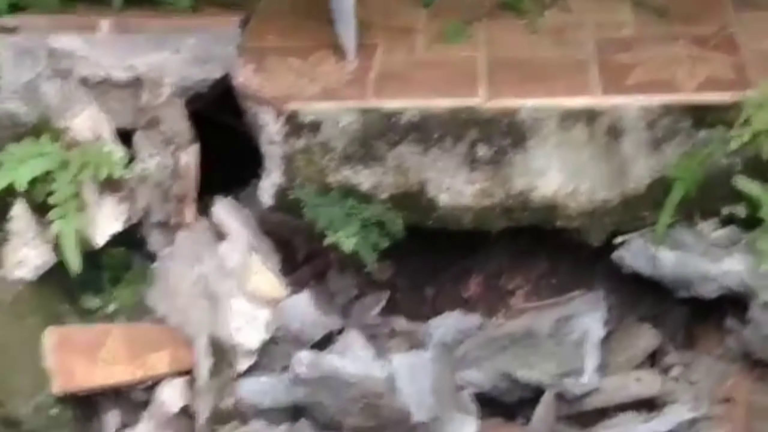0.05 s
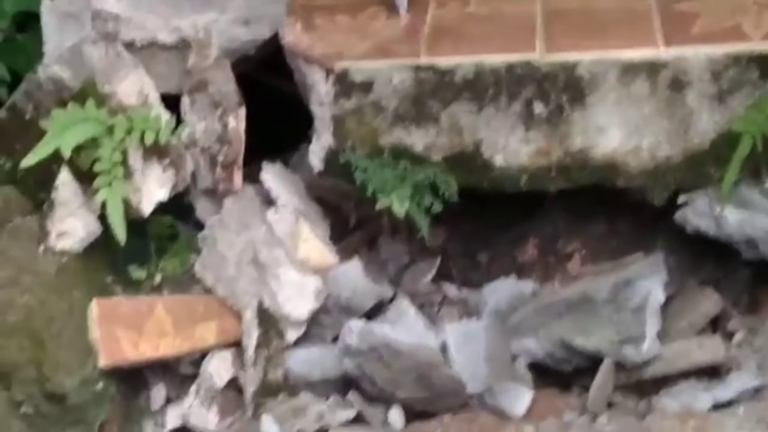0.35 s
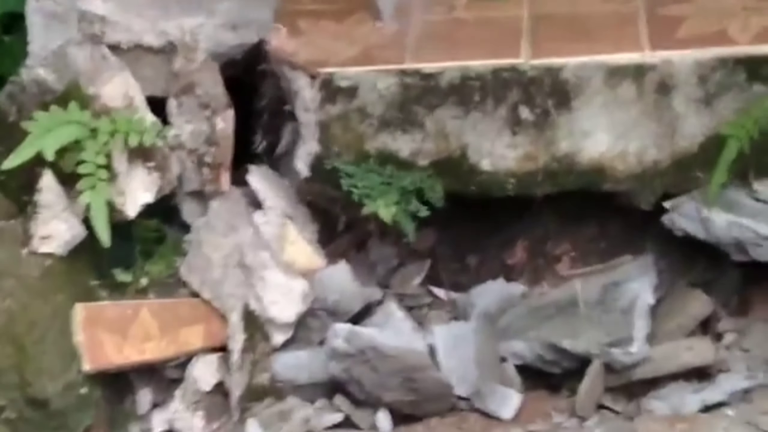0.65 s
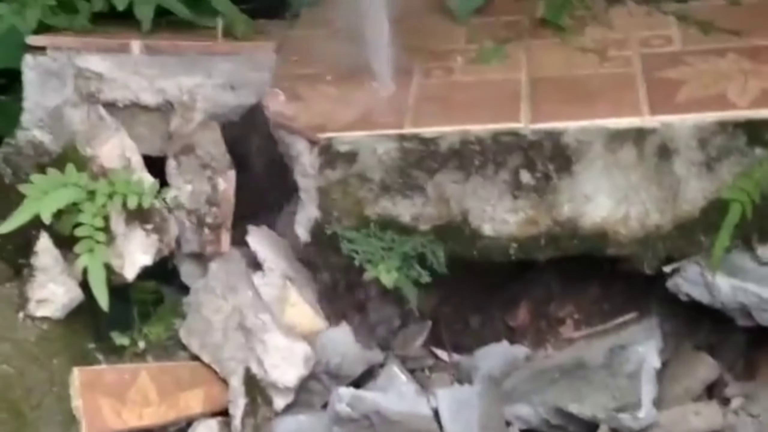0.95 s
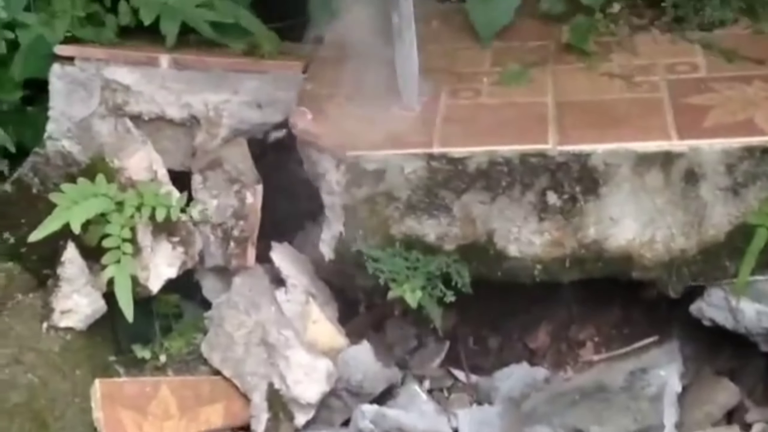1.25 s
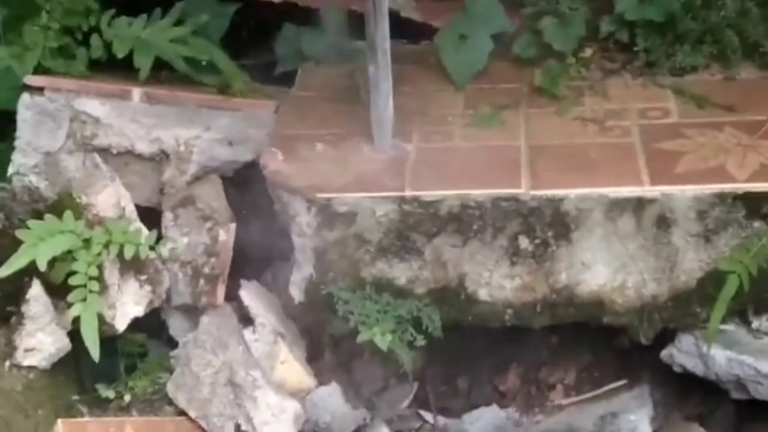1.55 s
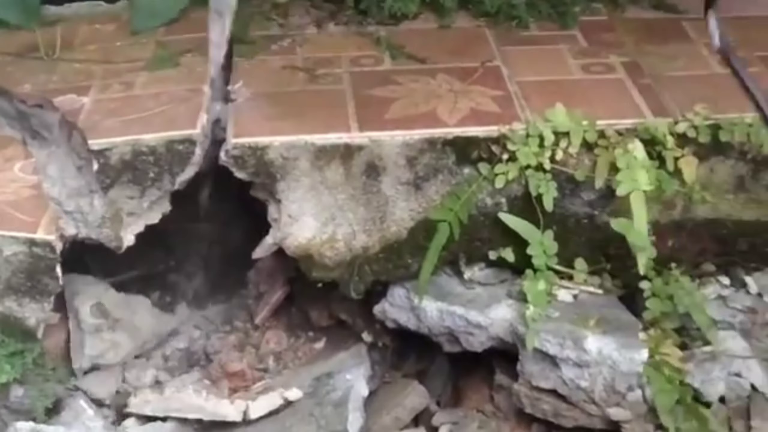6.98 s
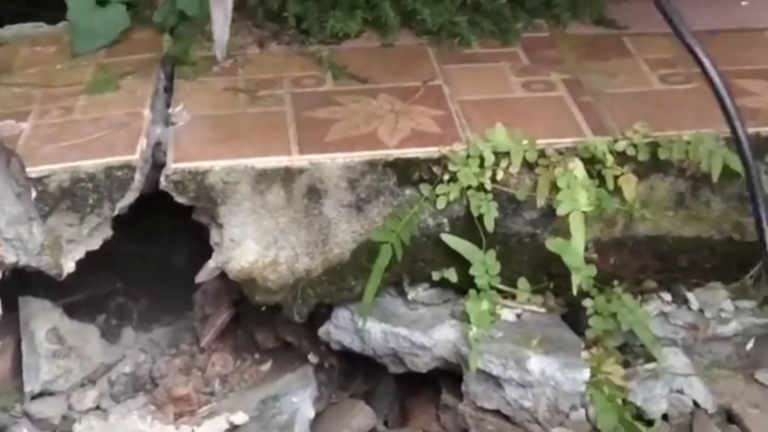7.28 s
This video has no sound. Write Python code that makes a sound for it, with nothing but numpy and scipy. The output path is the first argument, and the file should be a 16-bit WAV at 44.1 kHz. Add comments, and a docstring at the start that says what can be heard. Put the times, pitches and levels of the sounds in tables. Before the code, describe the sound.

A steel chisel tip clicks and scrapes lightly on tile, then an electric demolition hammer starts pounding concrete in a fast burst. The motor races briefly and winds down with a rattle. A few slow metallic knocks lead into a second, longer burst with a stronger gear whine, followed by one short jab. The microphone is close, outdoors in quiet air.

```python
"""Demolition hammer on a tiled slab

Outdoors in quiet air, one microphone close to an electric hammer chiselling tiled concrete: two long
bursts and a short jab. One crank speed drives it all: a blow each turn, gear clatter twice a turn, fan
rush and gear whine. Off the slab the motor races, then coasts down once the trigger is let go;
restarting, the striker knocks slowly before the chisel bites."""
import sys
import numpy as np
from scipy import signal
from scipy.fft import rfft, irfft
from scipy.io import wavfile
from scipy.ndimage import uniform_filter1d

SR = 44100
rng = np.random.default_rng(int(sys.argv[2]) if len(sys.argv) > 2 else 0)


def unload_wav(signal):
    """Save mono or channel-first audio to the path in sys.argv[1] as 16-bit WAV at rate SR, clipped to [-1, 1]."""
    wavfile.write(
        sys.argv[1],
        SR,
        np.round(np.clip(np.atleast_2d(signal).T, -1, 1) * 32767).astype(np.int16),
    )


N = 332073
TIME = np.arange(N) / SR
FREQS = np.linspace(0, SR / 2, 4097)

# chisel on the slab: first_blow_s, last_blow_s, loaded_crank_hz, spot_index
BURSTS = [(.5085, 2.155, 48.36, 0), (4.2185, 6.256, 48.12, 1), (6.556, 6.67, 48.12, 1)]
# the trigger: pulled_s, released_s
TRIGGER = [(.445, 2.585), (4.165, 6.42)]
# how each spot on the slab answers: blow_gain_db, loaded_whine_change_db, chisel_ring_db
SPOTS = [(-22.5, -3, -41.5), (-22.5, 7, -42.5)]
FREE_HZ, WORK_HZ, SPIN_UP_S = 59.5, 48, .11  # crank speed off and on the slab; motor time constant


def undb(db):
    """Decibels to gain."""
    return 10 ** (np.asarray(db) / 20)


def unit(x):
    """Scale to rms 1."""
    return x / np.sqrt(np.mean(x ** 2))


def colour(points, modes=()):
    """Gain over frequency: a broad spectrum lifted by resonances, of mean power 1."""
    hz, db = np.transpose(points)
    db = np.interp(np.log(FREQS + 1), np.log(hz), db)
    for centre, width, lift in modes:
        db = db + lift / (1 + (2 * (FREQS - centre) / width) ** 2)
    return unit(undb(db))


def band(lo_hz, hi_hz, order=6):
    """Gain of a band with soft edges."""
    return np.sqrt(1 / (1 + (lo_hz / (FREQS + 1)) ** order) / (1 + (FREQS / hi_hz) ** order))


def convolve(x, response):
    """Convolution, cut to the length of the scene."""
    return signal.oaconvolve(x, response)[:N]


def ring(x, gain):
    """Pass x through the causal filter that has this gain over frequency."""
    size = len(gain) - 1
    cepstrum = irfft(np.log(gain + 1e-6))
    cepstrum[1:size] *= 2
    cepstrum[size + 1:] = 0
    return convolve(x, irfft(np.exp(rfft(cepstrum)))[:size])


def impulses(times, sizes):
    """One click of the given size at each time."""
    return np.bincount(np.round(np.asarray(times) * SR).astype(int), sizes, N)[:N]


def swell(rise_s, decay_s, tail_db, tail_s, size=6000):
    """Envelope of one hit, of energy 1: a rise, a quick decay and a weak long tail."""
    t = TIME[:size]
    fall = np.exp(-t / decay_s) + undb(tail_db) * np.exp(-t / tail_s)
    shape = (1 - np.exp(-(t / rise_s) ** 2)) * fall
    return shape / np.linalg.norm(shape)


def shatter(hits, shape):
    """A fresh burst of noise for every hit."""
    return np.sqrt(np.abs(convolve(hits ** 2, shape ** 2))) * rng.standard_normal(N)


def mode(hz, decay_s):
    """One fading sine."""
    t = TIME[:SR // 5]
    return np.exp(-t / decay_s) * np.sin(2 * np.pi * hz * t)


def dense_modes(shape):
    """A ring of many close modes with an even spectrum, under the given envelope."""
    modes = rfft(shape * rng.standard_normal(len(shape)))
    return irfft(modes / np.sqrt(uniform_filter1d(np.abs(modes) ** 2, size=3)))


def wander(rate_hz):
    """A random drift with a spread near 1."""
    steps = rng.standard_normal(N // 100)
    return 1.2 * np.interp(TIME * rate_hz, np.arange(len(steps)), steps)


def on_slab(first, last):
    """1 during a burst and 0 outside it, with soft edges."""
    return uniform_filter1d(1. * ((TIME > first) & (TIME < last)), size=2000)


def grip(t, first, last):
    """The tip digs in, then is eased off before the burst ends: firmness of seat and easing, both 0-1."""
    loose, firm, dig_s, settle_s, lift_s = 0.18, 0.48, 0.37, 0.66, 0.42
    eased = np.clip(1 - (last - t) / lift_s, 0, 1)
    return np.interp(t - first, [dig_s, dig_s + settle_s], [loose, firm]) * (1 - eased), eased


def crank_speed():
    """Turns per second: power pulls to the free or loaded speed; without it fan, bearings and slab brake."""
    fan_brake_s, bearings_hz_per_s, slab_hz_per_s, step_s = 1.26, 5.5, 46, .001
    clock, hz, speeds = np.arange(0, N / SR, step_s), 0, []
    for t in clock:
        loaded = [speed for first, last, speed, _ in BURSTS if first <= t < last]
        if any(on <= t < off for on, off in TRIGGER):
            hz += step_s * ((loaded[0] if loaded else FREE_HZ) - hz) / SPIN_UP_S
        else:
            hz -= step_s * (hz / fan_brake_s + bearings_hz_per_s + slab_hz_per_s * bool(loaded))
        hz = max(hz, 0)
        speeds.append(hz)
    return np.interp(TIME, clock, speeds)


def blow_times(turns):
    """One blow per crank turn in each burst; rows: time_s, spot_index, seat, eased, is_last."""
    bursts = []
    for first, last, _, spot in BURSTS:
        start, end = np.interp([first, last], TIME, turns)
        times = np.interp(start + np.arange(round(end - start) + 1), turns, TIME)
        bursts.append([times, np.full(len(times), spot), *grip(times, first, last), times == times[-1]])
    return np.hstack(bursts)


def garden_air():
    """Quiet open air all round the microphone, its level drifting slightly."""
    # outdoor background: frequency_hz, level_db
    spectrum = [(30, -26), (120, -2), (220, -11), (400, -2), (800, -2), (2600, 2), (5000, -11.5),
                (8000, -16), (10000, -34), (15000, -55)]
    return undb(-49.5 + wander(1.0)) * ring(rng.standard_normal(N), colour(spectrum))


def taps():
    """The tip scrapes and clicks as it is set on the tile; the mechanism ticks as it restarts."""
    # light contacts: start_s, level_db, centre_hz, decay_s
    contacts = [(0.089, -33.5, 4000, .012), (0.103, -25.5, 6800, 0.017), (0.11, -31.5, 1700, 0.022),
                (0.1436, -17.5, 4530, 0.0033), (0.142, -39.5, 2630, 0.052), (.197, -35.5, 3380, 0.036),
                (0.2723, -16, 1260, 0.00048), (0.273, -41, 450, 0.0027), (.289, -35.5, 596, 0.0025),
                (0.402, -42, 2750, 0.0035), (0.439, -38, 2200, 0.034), (4.007, -34, 3000, 0.011),
                (4.092, -36, 2960, 0.013), (4.155, -32, 2500, 0.027)]
    # resonances of the tile under the tip: centre_hz, width_hz, lift_db
    tile_modes = [(940, 540, 8), (2500, 1400, 13), (6800, 1200, 10)]
    out = np.zeros(N)
    age = np.arange(SR // 3) / SR
    for start, db, hz, decay in contacts:
        burst = np.exp(-age / decay) * rng.standard_normal(len(age))
        tone = signal.butter(1, [hz / 2, min(hz * 2, SR / 3)], "band", fs=SR, output="sos")
        gain = undb(db) * np.sqrt(SR / (2 * np.pi * hz))  # narrow bands get more gain
        out[int(start * SR):][:len(age)] += gain * signal.sosfilt(tone, burst)
    return ring(out, colour([(100, 0), (400, 8), (8000, -6), (10000, -22), (15000, -22)], tile_modes))


def loose_chisel(turns):
    """The loose chisel is tossed against its holder twice a turn, ringing louder until it catches."""
    # spells of rattling: start_s, end_s, final_level_db
    rattles = [(1.95, 2.148, -35), (2.75, 3.297, -44), (5.98, 6.224, -32.5), (6.538, 6.675, -33)]
    # free ring of the chisel: pitch_hz, level_db, decay_s
    steel_modes = [(5740, 3, 0.015), (8230, 14, 0.0067), (8400, 5, .015), (11640, -9, .025),
                   (12300, -18, .025), (12520, -20, 0.032)]
    growth_db, stop_s = 12, 0.011
    level = 0
    for start, end, db in rattles:
        grown = np.clip((TIME - start) / (end - start), 0, 1)
        caught = np.exp(-np.maximum(TIME - end, 0) / stop_s)
        level += (TIME > start) * undb(db - growth_db * (1 - grown)) * caught
    times = np.interp(np.arange(1, 2 * turns[-1]) / 2, turns, TIME)
    tosses = rng.standard_normal((len(times), len(steel_modes))).T
    jingle = sum(undb(db) * convolve(impulses(times, toss), mode(hz, decay))
                 for (hz, db, decay), toss in zip(steel_modes, tosses))
    return level * unit(jingle)


def whine(hz, turns):
    """Tones of pinion and fan, which the housing radiates only in its middle range."""
    # one row per tone: relative_level_db, highest_radiated_hz
    tones = [(-2, 2100), (-6, 2500), (0, 4250), (-7, 3400)]
    gear_ratio, orders = 7.03, (5, 6, 10, 20)  # armature turns per crank turn; multiples that sing
    first_run_db, second_run_db, db_per_decade = -32.5, -36, 5
    bite_db, build_s, seated_db = -14, .33, -9
    flutter_db, waver_rad = 3.5, .025
    level_db = np.where(TIME < TRIGGER[1][0], first_run_db, second_run_db)
    # smothered as the tip bites, the whine builds up; a firm seat damps it
    for first, last, _, spot in BURSTS:
        seat, _ = grip(TIME, first, last)
        loaded_db = np.interp(TIME - first, [0, build_s], [bite_db, SPOTS[spot][1]])
        level_db = level_db + on_slab(first, last) * (loaded_db + seated_db * seat)
    angle = 2 * np.pi * gear_ratio * turns + waver_rad * wander(60)
    out = 0
    for k, (db, top_hz) in zip(orders, tones):
        radiated = np.interp(k * gear_ratio * hz, FREQS, band(1750, top_hz, order=40))
        flutter = undb(db + flutter_db * wander(22))
        out += radiated * flutter * np.sin(k * angle)
    return undb(level_db) * (hz / WORK_HZ) ** (db_per_decade / 20) * out


def motor(hz, turns):
    """Fan rush and gear teeth ring the housing; the crank rattles in its play at both dead centres."""
    # fan and gears: frequency_hz, level_db
    rush_spectrum = [(30, -51), (90, -40), (200, -37), (420, -22.5), (600, -15.5), (950, -13.5),
                     (1500, -5.5), (2000, 0), (2900, -3.5), (4000, -7.5), (5200, -27), (8500, -23.5),
                     (10500, -38.5), (14000, -47)]
    # resonances of the motor housing: centre_hz, width_hz, lift_db
    housing_modes = [(695, 123, 6), (1275, 130, 3.5), (1768, 355, 5.5), (2170, 160, 2.5), (2620, 73, 5.5),
                     (3270, 96, 1.5), (3730, 300, 0), (7400, 180, 8), (8310, 380, 6.5)]
    rush_db, surge_db, loaded_db, speed_exponent, play_opens_hz = -22, 5.5, -1.5, 1.3, 12
    pull = uniform_filter1d(np.gradient(hz) * SR, size=400) * SPIN_UP_S / FREE_HZ
    load = sum(on_slab(first, last) for first, last, *_ in BURSTS)
    level = undb(rush_db + surge_db * np.clip(pull, 0, 1) + loaded_db * load)
    level *= (hz / WORK_HZ) ** speed_exponent
    # the same rough teeth come round every turn, so their lines glide with the speed
    teeth = irfft(np.exp(2j * np.pi * rng.random(400)))
    mesh = unit(np.interp(turns % 1 * len(teeth), np.arange(len(teeth)), teeth))
    # the play opens as the motor coasts below its working speed
    coasting = (pull < 0) * np.clip((WORK_HZ - hz) / play_opens_hz, 0, 1)
    clatter = np.cos(2 * np.pi * turns) ** 8 * undb(2.5 * wander(90))
    pulsing = 1 + (.38 + .55 * coasting) * clatter
    pulsing /= np.sqrt(uniform_filter1d(pulsing ** 2, size=6000))
    rush = pulsing * (0.94 * rng.standard_normal(N) + 0.43 * mesh)
    housing = colour(rush_spectrum, housing_modes)
    # a faster fan sounds brighter
    speed = np.clip(hz, 15, 60) / 50
    lows = ring(rush, housing * band(1, 1756)) * speed ** -.55
    highs = ring(rush, housing * band(1433, 22000)) * speed ** 0.032
    return level * (lows + highs)


def striker():
    """Short steel knocks ring the barrel, mostly with the chisel free; some reach the slab as a thud, and one
    heavy thud closes the jab."""
    # knocks of the striker: start_s, level_db, thud_offset_db
    knocks = [(0.458, -8.5, -33), (0.5093, -6, -28), (3.819, -5.5, -12), (3.8817, -7, -25), (3.95, -9, -22),
              (4.028, -10.5, -33), (4.1172, -9.5, -29), (4.1833, -5, -21), (6.646, -15, -6)]
    # broad colour of a knock: frequency_hz, level_db
    knock_spectrum = [(200, -1), (600, 4.5), (1000, 7), (2200, -1.5), (3000, 0), (4200, 0.5), (6000, -7),
                      (8500, -5), (10500, -20.5), (15000, -24)]
    # resonances of the steel barrel: centre_hz, width_hz, lift_db
    barrel_modes = [(680, 66, 1), (1390, 220, 12), (1880, 200, 4), (2220, 830, 14), (8520, 1100, 9),
                    (12520, 80, 7)]
    times, db, thud_db = np.transpose(knocks)
    hits = impulses(times, undb(db + 5))
    shape = swell(0.00017, 0.0033, -7, 0.013, size=3000)
    steel = convolve(hits, dense_modes(shape)) + 3.05 * shatter(hits, shape)
    thud = shatter(impulses(times, undb(db + thud_db + 21.5)), swell(0.0049, 0.0095, -27, .02))
    barrel = colour(knock_spectrum, barrel_modes) * band(290, 20000)
    return ring(steel, barrel) + ring(thud, unit(band(65, 340)))


def chisel_blows(turns):
    """In the foreground the tip cracks, slab and steel ring, and the heavy thud comes last."""
    # broad colour of a blow: frequency_hz, level_db
    blow_spectrum = [(25, -24), (55, -17), (90, -1.5), (130, 0), (250, -1), (500, 1), (900, -0.5),
                     (1900, -4), (3000, -7), (4000, -6), (5500, -14.5), (8500, -16), (10500, -25.5),
                     (13500, -32.5)]
    # resonances of slab and chisel: centre_hz, width_hz, first_spot_lift_db, second_spot_lift_db
    slab_modes = [(336, 40, 7, 6), (505, 80, 4, 7), (735, 60, 7, 1), (1070, 60, 6, 0), (1260, 260, 1, 10),
                  (1440, 60, 3, 5), (2090, 160, 4, 11), (7200, 300, 3, 2), (8250, 500, 5, 6),
                  (11170, 120, 23, 14), (11400, 200, 12, 8)]
    # parts of a blow, thud to crack: low_hz, high_hz, level_db, eased_change_db, last_graze_change_db,
    # rise_s, decay_s, tail_db, tail_s, repeat_factor
    parts = [(1, 323, 34, -2.5, -15, 0.0079, 0.015, -9, 0.024, 1.13),
             (283, 2160, 33, -3.5, -13, 0.0018, 0.013, -15.5, .028, 1.32),
             (1950, 3480, 33.5, -0.5, 1, 0.0019, 0.0087, -21, 0.022, 1.15),
             (4550, 17000, 33.5, -1.5, -3, 0.00052, 0.0078, -12.5, 0.066, 0.37)]
    eased_decay = 0.55  # an eased tip leaves the slab at once: this share of each decay remains
    times, spots, seat, eased, last = blow_times(turns)
    *part_scatter_db, force_scatter, ring_scatter = rng.standard_normal((len(times), 6)).T
    spot_db, _, ring_db = np.array(SPOTS)[spots.astype(int)].T
    force_db = spot_db + 0.5 * (1 - seat) * force_scatter
    stone = colour(blow_spectrum, [(f, width, 0.26 * np.mean(lifts)) for f, width, *lifts in slab_modes])
    out = 0
    for row, scatter_db in zip(parts, part_scatter_db):
        lo, hi, db, eased_db, graze_db, rise, decay, tail_db, tail, repeats = row
        part = band(lo, hi)
        shape = swell(rise, decay, tail_db, tail)
        short = swell(rise, decay * eased_decay, tail_db, tail * eased_decay)
        size = undb(force_db + db + eased_db * eased + graze_db * last + scatter_db)
        alike = np.clip(repeats * seat, 0, 1)
        # crumbling stone answers each blow differently
        crumbs = shatter(impulses(times, size * np.sqrt((1 - alike) * (1 - eased))), shape)
        crumbs += shatter(impulses(times, size * np.sqrt((1 - alike) * eased)), short)
        out += ring(crumbs, stone * part)
        # under a firmly seated tip the slab rings the same way every time
        for spot in range(2):
            slab = colour(blow_spectrum, [(f, width, lifts[spot]) for f, width, *lifts in slab_modes])
            hits = impulses(times, size * np.sqrt(alike) * (spots == spot))
            out += convolve(hits, ring(dense_modes(shape), slab * part))
    # the free length of the chisel sings louder as the tip lets go
    sings = impulses(times, undb(ring_db + 7 * eased) * ring_scatter)
    return out + convolve(sings, mode(hz=11170, decay_s=0.013))


def scene():
    """Hammer and slab close up over quiet garden air, in mono."""
    hz = crank_speed()
    turns = np.cumsum(hz) / SR
    air = garden_air()
    machine = motor(hz, turns) + whine(hz, turns) + striker() + loose_chisel(turns)
    return (chisel_blows(turns) + machine + taps() + air)[None]


def record(dry):
    """The recorder rounds the highest peaks and cuts the top."""
    top_hz = 15500
    rounded = np.tanh(1.063 * dry) / 1.164
    return signal.sosfilt(signal.ellip(10, .2, 80, top_hz, fs=SR, output="sos"), rounded)


dry = scene()
out = record(dry)
unload_wav(out)
```